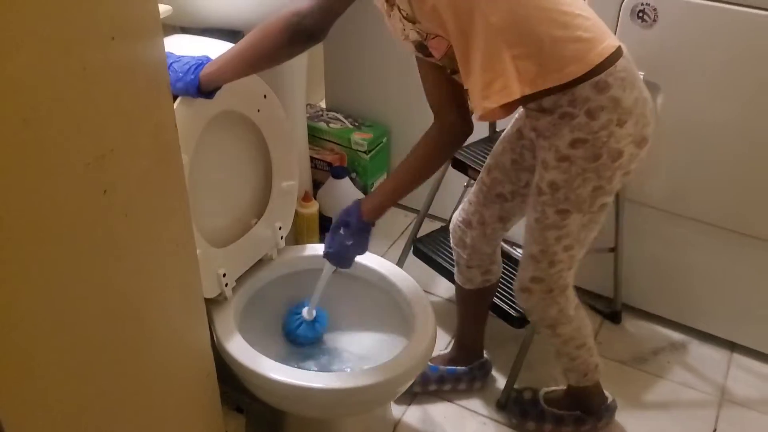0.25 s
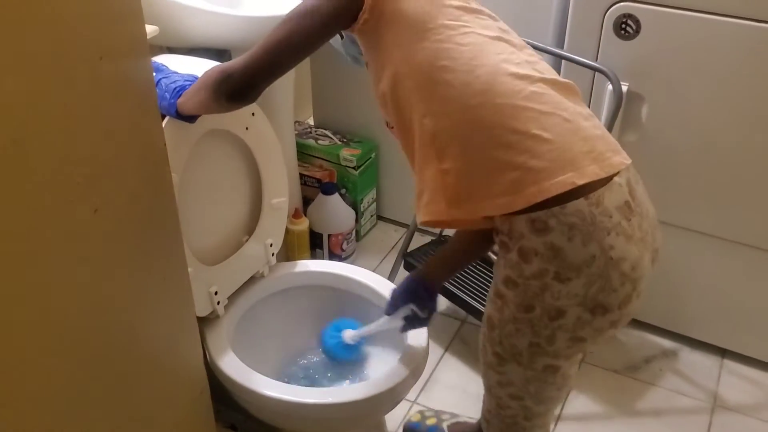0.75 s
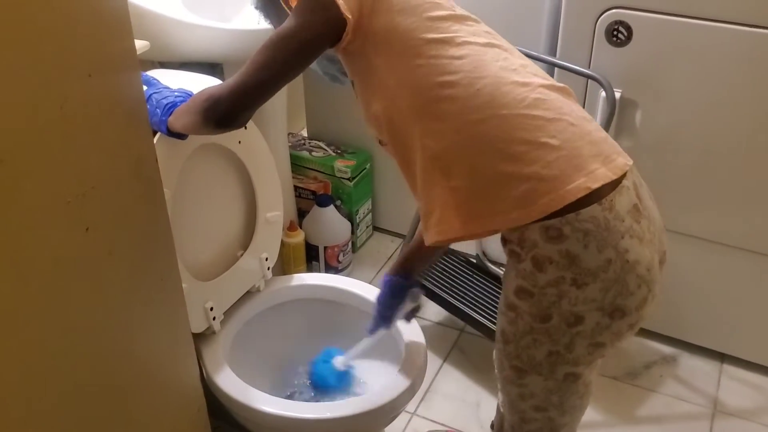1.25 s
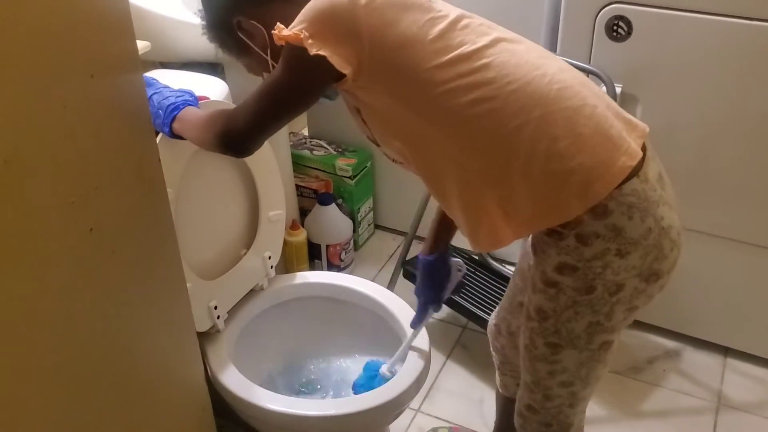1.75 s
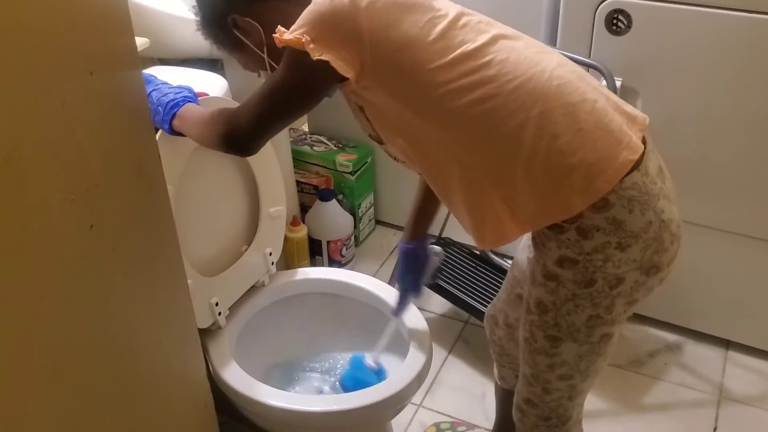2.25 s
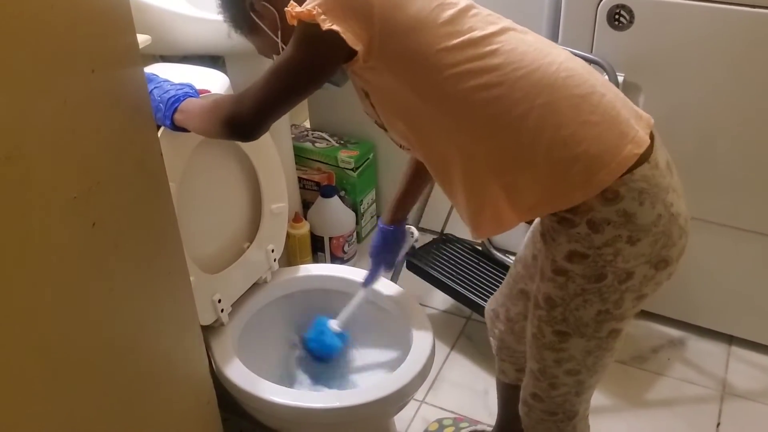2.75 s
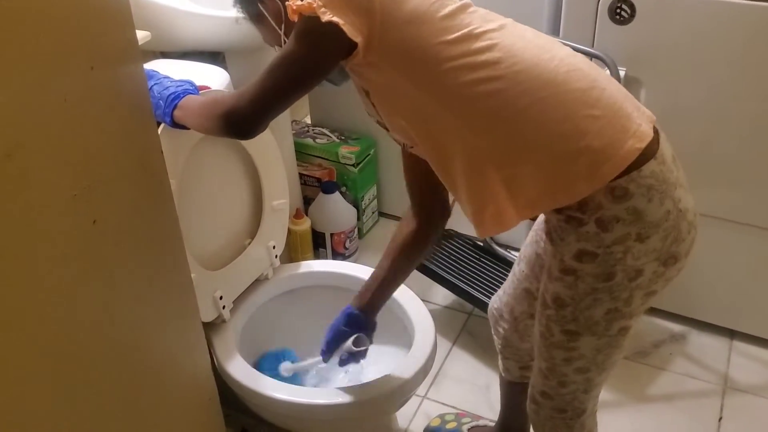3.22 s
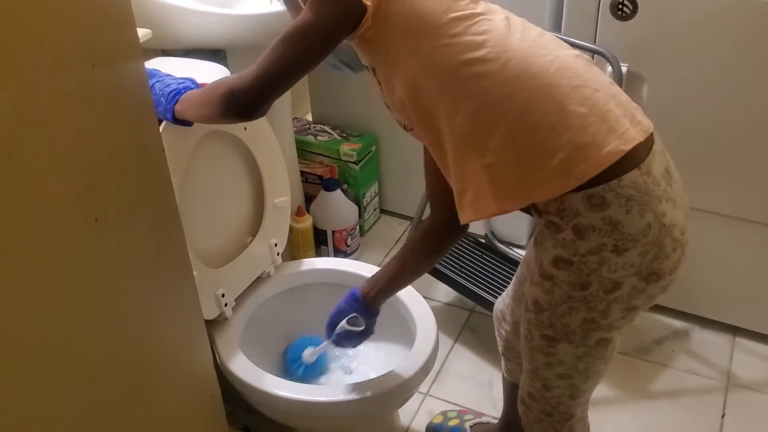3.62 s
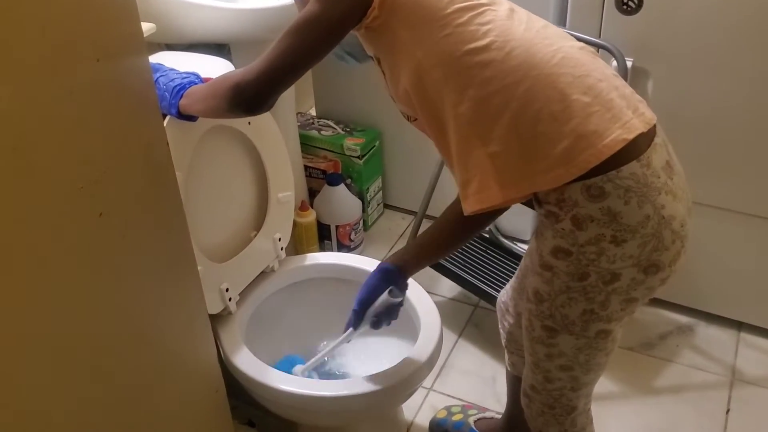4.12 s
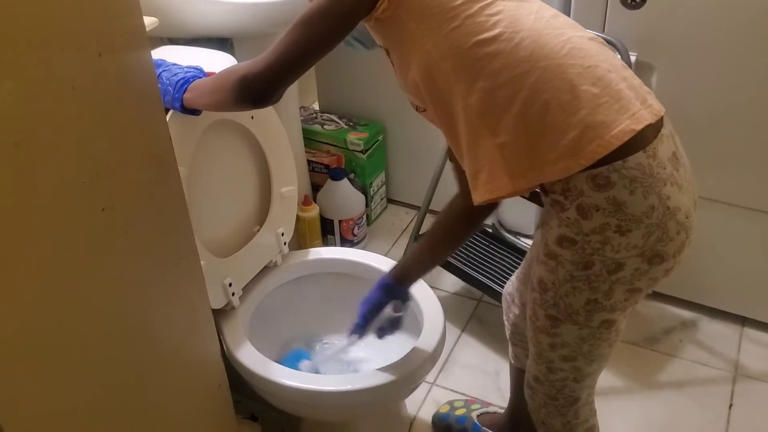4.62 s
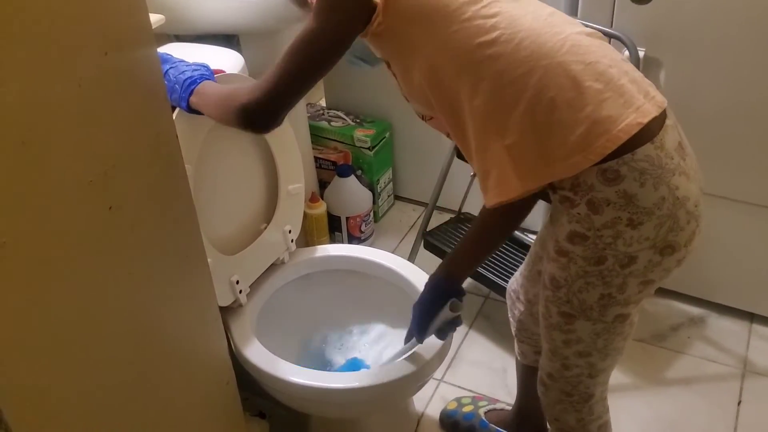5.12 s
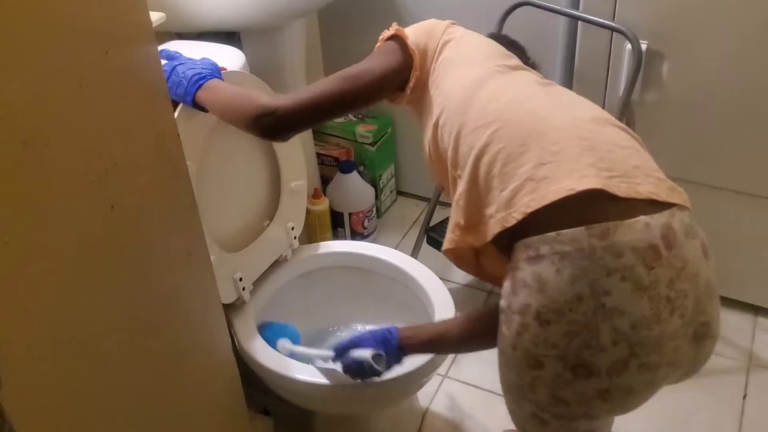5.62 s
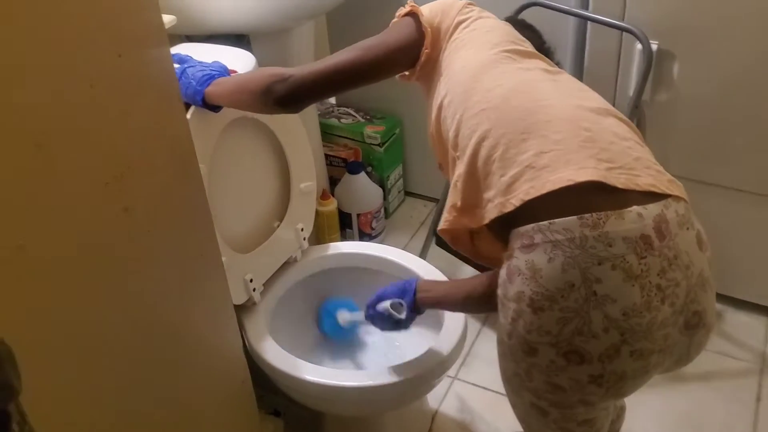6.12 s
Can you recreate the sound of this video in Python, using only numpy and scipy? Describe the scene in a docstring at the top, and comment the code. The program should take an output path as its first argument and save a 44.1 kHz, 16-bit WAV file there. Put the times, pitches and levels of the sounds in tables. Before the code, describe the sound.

Rapid scratchy scrubbing inside a toilet bowl: bristles rasp and hiss, the brush head knocks on porcelain, and a little water sloshes.

```python
"""A stiff brush scrubs a wet toilet bowl in quick short strokes: random bristle flicks, filtered into
a dull rasp and a bright hiss. Knocks of the brush head ring bowl modes with bursts of noise; sharp cracks
are decaying sines with noise snaps. Trapped air glugs as short rising sines; water sloshes as patchy flicks.
Shoves thump in low noise bands over rumble and a quiet noise floor; a small hard room echoes the bowl."""
import sys
import numpy as np
from scipy import signal
from scipy.fft import rfft, irfft, next_fast_len
from scipy.io import wavfile

SR = 44100
rng = np.random.default_rng(int(sys.argv[2]) if len(sys.argv) > 2 else 0)


def digitize_waveform(pressure):
    """Quantize a signal to 16-bit integers and store it at the path in sys.argv[1].

    Rows of a 2-D input are taken as channels; values are limited to [-1, 1].
    """
    field = np.atleast_2d(pressure).T
    bounded = np.clip(field, -1, 1)
    quanta = np.round(bounded * 32767).astype(np.int16)
    wavfile.write(sys.argv[1], SR, quanta)


N = 280476

# brush strokes: (fastest sweep [s], rasp level [dB], hiss level [dB], hiss rise [s], hiss fade [s])
STROKES = [(0.011, -49, -48.5, 0.029, 0.019), (0.126, -47.5, -47, 0.033, 0.016),
           (0.183, -46, -44.5, 0.0089, 0.015), (0.291, -47.2, -49, 0.05, 0.021),
           (0.368, -52, -49.5, 0.015, 0.037), (0.502, -45.5, -49.5, 0.012, 0.029),
           (0.622, -47.4, -54, 0.018, 0.017), (0.71, -46, -66, 0.0076, 0.029),
           (0.835, -47.5, -53, 0.079, 0.027), (0.913, -42, -41, 0.019, 0.029),
           (0.971, -39.0, -46.5, 0.016, 0.047), (1.105, -39, -39.5, 0.0059, 0.024),
           (1.199, -40.5, -42, 0.0053, 0.028), (1.3, -46.5, -49.6, 0.007, 0.03),
           (1.388, -41.5, -56, 0.0079, 0.014), (1.479, -39.5, -37, 0.011, 0.0055),
           (1.565, -38.5, -37, 0.037, 0.014), (1.604, -41.5, -39.5, 0.0052, 0.026),
           (1.664, -40, -58.5, 0.014, 0.0088), (1.815, -39.0, -43, 0.15, 0.094),
           (1.906, -40, -40.5, 0.011, 0.0063), (1.97, -39, -43, 0.013, 0.016),
           (2.132, -42, -42.5, 0.02, 0.012), (2.216, -42.5, -41.5, 0.032, 0.049),
           (2.325, -45.5, -48, 0.022, 0.16), (2.423, -39.5, -42, 0.0096, 0.019),
           (2.543, -44.5, -52, 0.013, 0.029), (2.628, -43.5, -45.5, 0.013, 0.042),
           (2.793, -45.5, -50, 0.032, 0.012), (2.861, -41.5, -43.5, 0.017, 0.035),
           (2.95, -57.5, -54, 0.043, 0.057), (3.029, -45.5, -55.5, 0.03, 0.035),
           (3.17, -49, -52, 0.017, 0.033), (3.236, -44.5, -44, 0.011, 0.047),
           (3.399, -44, -50.5, 0.013, 0.024), (3.463, -43.5, -49, 0.003, 0.052),
           (3.61, -40.5, -44, 0.0025, 0.017), (3.679, -44.5, -50, 0.027, 0.03),
           (3.865, -46, -51.9, 0.016, 0.0098), (3.897, -43.5, -53, 0.015, 0.016),
           (3.979, -42.5, -43, 0.0043, 0.018), (4.14, -54.5, -61.5, 0.15, 0.029),
           (4.296, -61.5, -66, 0.068, 0.031), (4.494, -48, -51, 0.023, 0.029),
           (4.61, -48, -59.5, 0.026, 0.062), (4.801, -43.5, -47.5, 0.025, 0.035),
           (4.868, -47.5, -51.5, 0.013, 0.0099), (4.923, -48.5, -55, 0.0057, 0.076),
           (5.101, -49, -53, 0.015, 0.043), (5.266, -49, -54, 0.02, 0.039),
           (5.417, -42.5, -50, 0.0025, 0.02), (5.621, -49, -38.5, 0.029, 0.016),
           (5.677, -51, -31.5, 0.011, 0.028), (5.791, -43.5, -31.5, 0.021, 0.011),
           (5.83, -45, -33.5, 0.015, 0.042), (5.966, -48.8, -36.5, 0.013, 0.025),
           (6.005, -49, -37.5, 0.0072, 0.035), (6.161, -54.5, -43, 0.0048, 0.014),
           (6.262, -56, -62.5, 0.018, 0.055)]
# relative spectra of rasp and hiss: (frequency [Hz], density [dB per Hz])
RASP_SPECTRUM = [(500, -26), (900, -19), (1400, -10), (2000, -0.5), (2500, 0.5), (3200, -1.5), (4500, -6),
                 (6500, -9), (8500, -46)]
HISS_SPECTRUM = [(1500, -18.5), (3500, -13), (6200, -0.5), (8000, -9.5), (10000, -2.5), (12500, -1.5),
                 (14500, 3), (16000, -12), (18000, -20)]
REST_RASP_DB, REST_HISS_DB = -66, -85   # brush barely moving
RASP_SLOWNESS = 1.234   # rasp rise and fade times over those of the hiss

# brush head on porcelain: (time [s], hollow level [dB], hollow centre [Hz], rim level [dB], rim centre [Hz],
# upper level [dB], upper centre [Hz], scuff peak [dB], scuff t60 [s])
KNOCKS = [(0.184, -57, 172, -51.5, 1510, -62, 3990, -45, 0.081),
          (0.476, -85, 180, -60, 1250, -64, 3100, -59, 0.29),
          (0.594, -66.5, 591, -60, 1520, -51.5, 1560, -60, 0.18),
          (0.705, -76, 640, -43, 926, -61, 2900, -61, 0.094),
          (0.775, -80, 400, -73, 1400, -46, 2640, -65, 0.1),
          (0.924, -48, 374, -37, 1040, -27.5, 2560, -25.5, 0.18),
          (1.102, -50, 169, -26, 996, -28.5, 2670, -29, 0.14),
          (1.281, -79, 175, -54, 1160, -67, 2260, -55, .065),
          (1.383, -57.5, 399, -43.5, 1380, -44, 2340, -45, 0.15),
          (1.552, -41.5, 425, -42.5, 1180, -34.5, 2120, -26.5, 0.066),
          (1.751, -77, 574, -59, 1120, -43, 2030, -53, 0.074),
          (1.783, -43, 500, -46, 1030, -32, 2720, -27, 0.074),
          (1.843, -57, 513, -68, 1400, -45, 2860, -44, 0.071),
          (2.253, -54.5, 503, -51, 1420, -40.5, 2480, -45, 0.093),
          (2.428, -69, 270, -47, 1300, -52, 3600, -48, 0.058),
          (2.537, -90, 186.4, -75, 1410, -51, 1900, -56, .07),
          (2.639, -94, 546, -57, 1240, -48, 2240, -59, 0.18),
          (2.877, -54, 437, -40.5, 1240, -38.5, 2390, -34, 0.098),
          (3.024, -75, 300, -54, 1490, -50, 2300, -54, 0.069),
          (3.463, -92, 237, -65, 1500, -38, 2400, -49, 0.075),
          (3.482, -69, 348, -43, 1355, -40, 2470, -53, .11),
          (3.612, -61, 318, -50, 1170, -42, 1680, -36, 0.1),
          (3.675, -78, 361, -50.5, 1530, -48, 2540, -38.5, 0.27),
          (3.811, -85, 172, -79, 1470, -51.5, 2000, -63, 0.15),
          (3.894, -47, 331, -44.5, 1290, -40, 2080, -37, 0.096),
          (3.974, -91, 366, -44.5, 1690, -47, 2280, -51, 0.27),
          (4.414, -94, 172, -65, 1390, -56, 2280, -46, 0.092),
          (4.49, -92, 172, -79, 711, -52, 2240, -67, 0.57),
          (5.119, -82, 272, -62, 1270, -51.5, 2020, -50, 0.3),
          (5.417, -52, 290.5, -36.5, 950, -38.5, 2100, -36.5, 0.048),
          (5.663, -74, 188, -63, 1160, -69, 3730, -44, 0.42),
          (5.784, -54, 367, -54, 720, -41.5, 3100, -29, 0.07),
          (5.967, -55.5, 184, -63, 773, -56, 3000, -35.5, 0.22),
          (6.11, -84, 216, -76, 1060, -44, 2560, -61, 0.066),
          (6.255, -59.5, 595, -54, 1370, -54, 1970, -43, .12)]
# bowl modes: (frequency [Hz], level [dB], t60 before the cycle limit [s])
BOWL_MODES = [(200, 17, 0.048), (253, -8, 0.21), (342, 6, 0.083), (397, -4.5, 0.068), (479.6, 8.5, 0.054),
              (513.7, 9.5, 0.054), (592, 1, 0.13), (777, 7.5, 0.057), (894, -7.5, 0.083),
              (1056.5, 4.5, 0.12), (1176, 5, 0.064), (1340, -5, 0.044), (1437, 1.5, 0.028), (1524, 0, 0.06),
              (1660, -2, 0.041), (1960, -0.5, 0.038), (2042, -1, 0.061), (2158, -0.5, 0.043),
              (2450, -4, 0.044), (2367, -1.5, 0.023), (2576, 2.5, 0.019), (2840, -3, 0.058),
              (2920, -2.5, 0.073), (3147, -3, 0.028), (3220, -41.5, 0.0093), (3470, 7, 0.032),
              (3890, 8.5, 0.012), (3920, 11.5, 0.059), (4330, 15, 0.016)]
# spread of a blow around its centre: hollow, rim, upper [octaves]
REACH_OCTAVES = [0.35, 0.17, 0.3]
CONTACT_RISE_S, CUSHIONED_RISE_S = 0.0013, 0.0061   # bare, through the bristles
ONSET_DB, ONSET_T60_S = -5, 0.03   # shorter decay added to each contact
LONGEST_RING_CYCLES = 60   # the brush resting on the glaze damps the modes

# sharp cracks, many at the start of a knock: (time [s], click level [dB], click frequency [Hz], snap level [dB])
CRACKS = [(0.4767, -49, 3320, -56), (0.7048, -34, 2900, -45), (0.9409, -33, 2430, -50),
          (1.1029, -8.5, 2920, -29), (1.382, -48, 2210, -58), (1.7896, -36, 2740, -32),
          (2.878, -49, 2090, -51), (3.1577, -52, 2710, -46), (3.464, -53, 2720, -42),
          (3.6121, -28, 1690, -47), (3.674, -38, 2540, -46), (3.815, -58, 2230, -61),
          (3.9764, -43, 2550, -44), (4.415, -51, 2320, -44), (5.4177, -19.5, 2130, -28),
          (5.6615, -43, 3970, -23), (5.7842, -23, 4900, -24), (6.114, -53, 2630, -40),
          (6.2571, -33, 1990, -48)]
CLICK_T60_S, SNAP_T60_S = 0.0029, 0.021

# air trapped in the water: (middle [s], peak level [dB], pitch at the middle [Hz], length [s])
GLUGS = [(2.448, -55, 670, 0.024), (2.485, -67.5, 724, 0.094), (2.583, -59, 1150, .03),
         (3.132, -63.5, 690, 0.037), (4.05, -62, 678, 0.064), (4.512, -63, 726, 0.081),
         (4.707, -62.5, 597, 0.071), (4.705, -57, 683, 0.023), (5.715, -58, 417, .04),
         (5.818, -39, 168, 0.025), (5.83, -50.5, 734, .035), (5.87, -53, 420, 0.038),
         (5.979, -58, 774, 0.024), (5.995, -47, 169, 0.044), (6.06, -60, 754, .04),
         (6.083, -57.5, 420, 0.086), (6.2, -57, 378, 0.043), (6.207, -61, 550, .03),
         (6.348, -50.5, 365, 0.046)]

# sloshing water: (time [s], level [dB])
SLOSH_LEVEL = [(0.0, -68.5), (0.56, -70.5), (1.13, -61), (1.61, -71), (1.75, -66), (2.05, -72),
               (3.19, -75.5), (3.51, -68.5), (4.32, -78), (4.55, -87), (4.73, -71.5), (5.19, -71.5),
               (5.85, -63), (6.36, -68)]
# its relative spectrum: (frequency [Hz], density [dB per Hz])
SLOSH_SPECTRUM = [(200, -7.5), (330, 2.5), (500, -6.5), (750, 0.5), (1000, -14)]

# hard shoves of the brush: (time [s], level near 55 Hz [dB], level near 170 Hz [dB])
THUMPS = [(0.0, -55, -56), (0.18, -64, -52.5), (0.32, -57, -59.5), (0.61, -44, -58.5), (0.87, -76, -59),
          (0.98, -49, -49.5), (1.15, -48, -51.5), (1.32, -56, -52.5), (1.57, -52, -46), (1.83, -44.5, -57),
          (2.31, -66, -64), (2.93, -56, -57.5), (3.14, -57, -68), (3.3, -63, -57), (3.53, -58, -85),
          (3.67, -58, -84), (3.91, -57.5, -55.5), (4.03, -58, -79), (5.46, -56, -61.5), (5.81, -55, -50),
          (5.96, -48.5, -60)]
# rumble between thumps: (time [s], level near 55 Hz [dB], level near 170 Hz [dB])
RUMBLE_LEVELS = [(0.0, -63, -64), (0.65, -62.5, -72.5), (1.1, -58, -66), (2.0, -63, -72.5),
                 (3.97, -69.5, -75), (4.07, -63, -76.5), (5.08, -70.5, -74), (5.9, -57, -64.5),
                 (6.36, -62, -77)]
THUMP_RISE_S, THUMP_FADE_S = 0.011, 0.025
RUMBLE_LUMPS_DB, RUMBLE_LUMPS_HZ = 2.5, 4

# relative spectrum of the room floor: (frequency [Hz], density [dB per Hz])
FLOOR_SPECTRUM = [(59, -29), (100, -31), (429, -20), (936, -9), (2580, -10), (6260, -13), (8060, -11),
                  (12600, -41), (15500, -12)]
FLOOR_DB = -68.5

ROOM_T60_S, WALL_CUT_HZ, ROOM_LOW_HZ, ROOM_DB = 0.21, 3550, 647, -12.5   # t60 holds for the lows
# likeness of left and right: (frequency [Hz], correlation [-1 to 1])
LIKENESS = [(60, .98), (400, .96), (650, .35), (1200, 0), (4500, .05), (8500, .72), (13000, .8)]
# stereo balance: (frequency [Hz], left minus right [dB])
BALANCE = [(60, 0.0), (110, 0.0), (200, -0.5), (380, 0.0), (700, 1.5), (1290, 3.0), (2380, 5.0),
           (4400, 0.0), (8120, 0.0), (15000, 0.5)]
CUTOFF_HZ = 16150


def bristles():
    """Tufts catch and let go together: rasp and hiss share one flutter and the same sparse scratches."""
    s, rasp_db, hiss_db, rise_s, fade_s = np.transpose(STROKES)
    rasp_db = swells(s, rasp_db, rise_s * RASP_SLOWNESS, fade_s * RASP_SLOWNESS, REST_RASP_DB)
    hiss_db = swells(s, hiss_db, rise_s, fade_s, REST_HISS_DB)
    flutter_db = 1.1 * drift(29)
    scratches = flicks(250, spread_db=5.5)
    rasp_flicks = flicks(5000, spread_db=-1.5) + 0.5 * scratches
    rasp = coloured(rasp_flicks, RASP_SPECTRUM, patchy_db=2.5, flicker_hz=16.7)
    hiss_flicks = flicks(9000, spread_db=3.5) + 0.23 * scratches
    hiss = coloured(hiss_flicks, HISS_SPECTRUM, patchy_db=1.5, flicker_hz=27)
    return from_db(flutter_db) * (from_db(rasp_db) * rasp + from_db(hiss_db) * hiss)


def knocks():
    """Each knock is a short scuffing contact; the spot struck picks the modes."""
    t = np.arange(SR // 4) / SR
    out = np.zeros((2, N + len(t)))
    scuff_band = signal.butter(1, [600, 5000], "band", fs=SR, output="sos")
    for s, hollow_db, hollow_hz, rim_db, rim_hz, upper_db, upper_hz, scuff_db, scuff_t60_s in KNOCKS:
        cushioned = hollow_db > rim_db - 3 and hollow_hz > 400   # blow low in the bowl
        rise_s = CUSHIONED_RISE_S if cushioned else CONTACT_RISE_S
        decay = from_db(-60 * t / scuff_t60_s) + from_db(ONSET_DB - 60 * t / ONSET_T60_S)
        contact = (1 - np.exp(-t / rise_s)) ** 2 * decay
        grit = rng.standard_normal((len(BOWL_MODES) + 1, 2, len(t)))
        blow = from_db(scuff_db) * peak_one(signal.sosfilt(scuff_band, contact * grit[-1]))
        centres_hz = np.array([hollow_hz, rim_hz, upper_hz])
        centres_gain = from_db([hollow_db, rim_db, upper_db])
        for (hz, mode_db, t60_s), noise in zip(BOWL_MODES, grit):
            reach = np.log2(hz / centres_hz) / REACH_OCTAVES
            stirred = np.sum(centres_gain * np.exp(-reach ** 2 / 2))
            damped_t60_s = min(t60_s, LONGEST_RING_CYCLES / hz)
            mid, side = peak_one(ring(contact * noise, hz, damped_t60_s))
            blow += stirred * from_db(mode_db) * placed(mid, side, hz)
        start = round(s * SR)
        out[:, start:start + len(t)] += blow
    return out[:, :N]


def cracks():
    """A click rings out within milliseconds; splaying bristles add a bright snap that starts at once."""
    t = np.arange(SR // 8) / SR
    out = np.zeros(N + len(t))
    for s, click_db, hz, snap_db in CRACKS:
        snap_noise = rng.standard_normal(len(t)) * from_db(-60 * t / SNAP_T60_S)
        snap = peak_one(np.diff(snap_noise, prepend=0))   # differencing brightens
        click = np.sin(2 * np.pi * hz * t) * from_db(-60 * t / CLICK_T60_S)
        start = round(s * SR)
        out[start:start + len(t)] += from_db(click_db) * click + from_db(snap_db) * snap
    return out[:N] * from_db([[1.5], [-1.5]])   # leans left


def glugs():
    """Each air pocket swells and fades on one pitch, rising a little as it shrinks."""
    t, out = np.arange(N) / SR, np.zeros(N)
    for s, peak_db, hz, length_s in GLUGS:
        since = t - s
        swell = np.exp(-(3.8 * since / length_s) ** 2)
        phase = 2 * np.pi * hz * since * (1 + 0.48 * since) + rng.uniform(0, 2 * np.pi)
        out += from_db(peak_db) * swell * np.sin(phase)
    return out


def slosh():
    """Water pushed about by the brush: patchy low-mid gurgle."""
    gurgle = coloured(flicks(600, spread_db=4.0), SLOSH_SPECTRUM, patchy_db=2.5, flicker_hz=19)
    return from_db(in_time(SLOSH_LEVEL)[0]) * gurgle


def rumble():
    """Two low noise bands, nearly alike left and right: thumps swell over a lumpy resting level."""
    s, *thumps_db = np.transpose(THUMPS)
    bands_hz = [(37.8, 90), (138, 218.4)]
    out = 0
    for band_hz, thump_db, rest_db in zip(bands_hz, thumps_db, in_time(RUMBLE_LEVELS)):
        lumpy_db = rest_db + RUMBLE_LUMPS_DB * drift(RUMBLE_LUMPS_HZ)
        level_db = swells(s, thump_db, THUMP_RISE_S, THUMP_FADE_S, lumpy_db)
        band = signal.butter(3, band_hz, "band", fs=SR, output="sos")
        mid, side = signal.sosfilt(band, rng.standard_normal((2, N)))
        out = out + from_db(level_db) * rms_one(mid + 0.12 * side * [[1], [-1]])
    return out


def room_floor():
    """Quiet steady noise, its bands flickering slightly."""
    noise = rng.standard_normal((2, 2, N))
    return from_db(FLOOR_DB) * coloured(noise, FLOOR_SPECTRUM, patchy_db=1.5, flicker_hz=5)


def room(x):
    """Twelve feedback delays a side, duller on every round; a high-pass thins the lows of the echoes."""
    size = next_fast_len(N + SR)
    hz = np.arange(size // 2 + 1) * SR / size
    walls = 1 / (1 + 1j * hz / WALL_CUT_HZ)
    echoes = np.zeros((2, len(hz)), complex)
    for k, lag_s in enumerate(rng.uniform(0.008, 0.035, size=24)):
        loop = from_db(-60 * lag_s / ROOM_T60_S) * walls * np.exp(-2j * np.pi * hz * lag_s)
        echoes[k % 2] += (-1) ** (k // 2) * loop / (1 - loop)
    thin = 1j * hz / (ROOM_LOW_HZ + 1j * hz)
    return irfft(echoes * thin * rfft(x, size), size)[:, :N]


def flicks(per_s, spread_db):
    """Four trains of flicks, two mid-side pairs: random moments, uneven sizes, either sign."""
    sizes = from_db(spread_db * np.minimum(rng.exponential(1, (4, N)), 3.0))
    signed = sizes * rng.choice([-1, 1], (4, N))
    hits = rng.random((4, N)) < per_s / SR
    return rms_one(signed * hits).reshape(2, 2, N) + 1e-18


def coloured(source, spectrum, patchy_db, flicker_hz):
    """Third-octave bands, each with its own level and flicker; rms 1."""
    out, hzs = 0, np.array(spectrum)[:, 0]
    octaves = np.log2(min(hzs[-1], 19000) / hzs[0])
    edges_hz = hzs[0] * 2 ** np.arange(0, octaves, 1 / 3)
    for k, (low_hz, high_hz) in enumerate(zip(edges_hz, edges_hz[1:])):
        band = signal.butter(2, [low_hz, high_hz], "band", fs=SR, output="sos")
        mid, side = signal.sosfilt(band, source[k % 2])   # neighbours use different pairs
        hz = np.sqrt(low_hz * high_hz)
        level_db = at_hz(spectrum, hz) + patchy_db * drift(flicker_hz)
        out = out + from_db(level_db) * placed(mid, side, hz)
    return rms_one(out)


def placed(mid, side, hz):
    """A band in left and right, with the likeness and balance of its pitch."""
    alike = np.clip(at_hz(LIKENESS, hz), -1, 1)
    lean = from_db(at_hz(BALANCE, hz) / 2 * np.array([[1], [-1]]))
    return lean * (np.sqrt(1 + alike) * mid + np.sqrt(1 - alike) * side * [[1], [-1]])


def swells(times_s, levels_db, rise_s, fade_s, rest_db):
    """Level in dB of separate swells, their powers added over a resting level."""
    t = np.arange(0, N + 64, 64) / SR   # every 64th sample
    since = t[:, None] - times_s
    scaled = np.clip(since / np.where(since < 0, rise_s, fade_s), -40, 40)
    shape = np.cosh(scaled) ** -2.0
    power = np.interp(np.arange(N) / SR, t, shape @ from_db(levels_db) ** 2)
    return 10 * np.log10(power + from_db(rest_db) ** 2)


def drift(rate_hz):
    """Slow random wander of rms 1: noise at every 40th sample through a double one-pole."""
    r = np.exp(-80 * np.pi * rate_hz / SR)
    noise = rng.standard_normal(N // 40 + 2002)
    slow = signal.lfilter([1], [1, -2 * r, r * r], noise)[2000:]   # skip the filter's settling
    return np.interp(np.arange(N) / 40, np.arange(len(slow)), rms_one(slow))


def ring(push, hz, t60_s):
    """One mode: a unit click sets a decaying sine ringing."""
    r, w = from_db(-60 / (t60_s * SR)), 2 * np.pi * hz / SR
    return signal.lfilter([0, np.sin(w)], [1, -2 * r * np.cos(w), r * r], push + 1e-18)


def in_time(rows):
    """Each column of a curve, sample by sample."""
    s, *columns = np.transpose(rows)
    return [np.interp(np.arange(N) / SR, s, c) for c in columns]


def at_hz(points, hz):
    """A curve read on a log-frequency axis."""
    hzs, values = np.transpose(points)
    return np.interp(np.log(hz), np.log(np.maximum(hzs, 1)), values)


def from_db(db):
    """Gain of a level in dB."""
    return 10 ** (np.asarray(db) / 20)


def rms_one(x):
    """Scaled to rms 1 over all rows together."""
    return x / np.sqrt(np.mean(x ** 2) + 1e-20)


def peak_one(x):
    """Each row scaled to peak 1."""
    return x / np.abs(x).max(axis=-1, keepdims=True)


def scene():
    """Brush and bowl with their room, water, rumble and floor."""
    bowl = bristles() + knocks() + cracks() + glugs()
    return bowl + from_db(ROOM_DB) * room(bowl) + slosh() + rumble() + room_floor()


def record(dry):
    """A steep low-pass cuts the top."""
    return signal.sosfilt(signal.cheby2(14, 70, CUTOFF_HZ, fs=SR, output="sos"), dry)


dry = scene()
out = record(dry)
digitize_waveform(out)
```